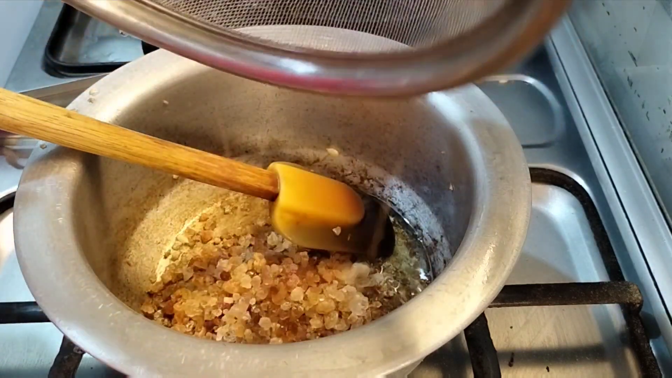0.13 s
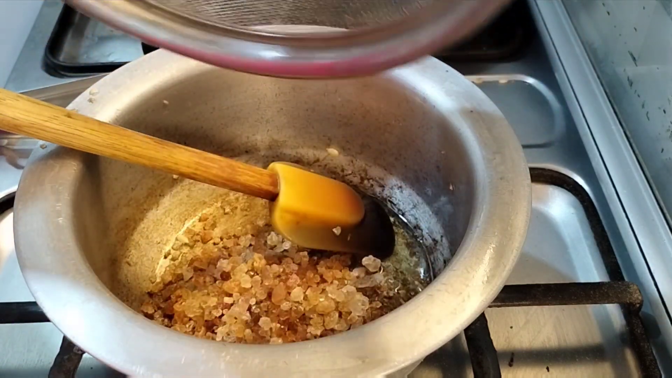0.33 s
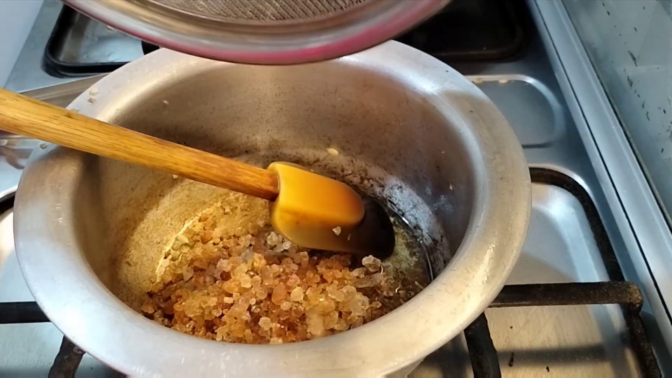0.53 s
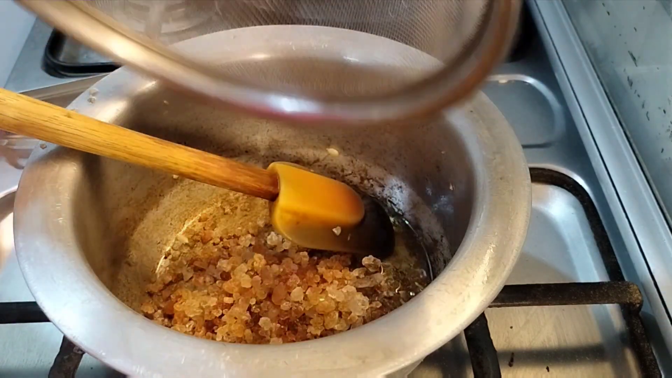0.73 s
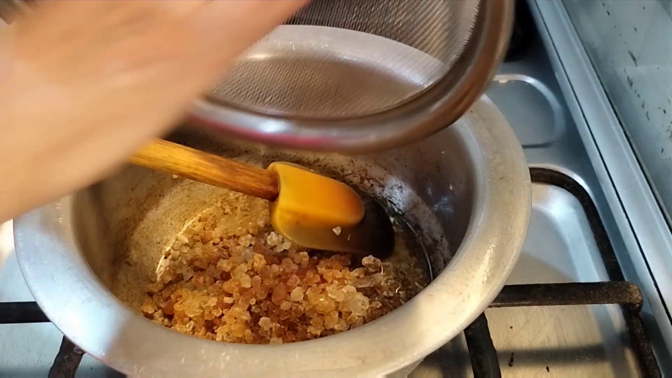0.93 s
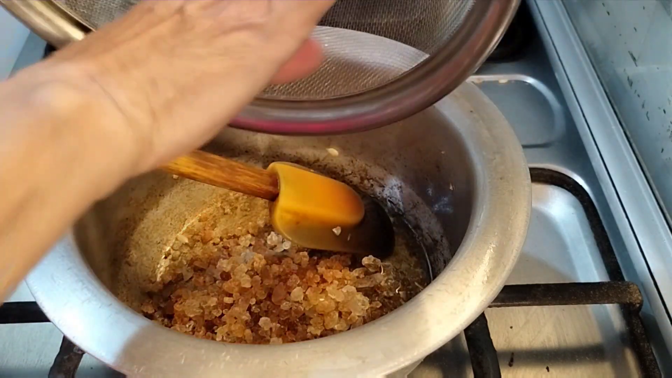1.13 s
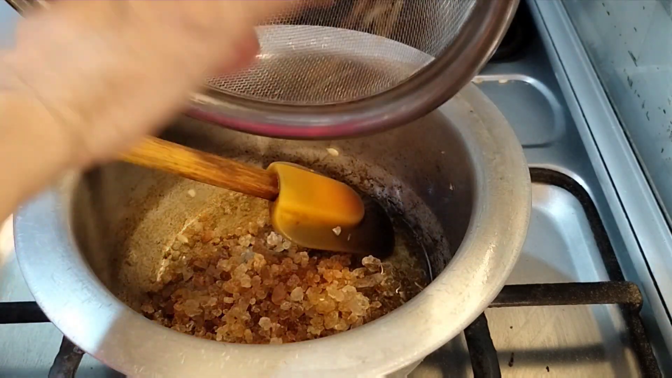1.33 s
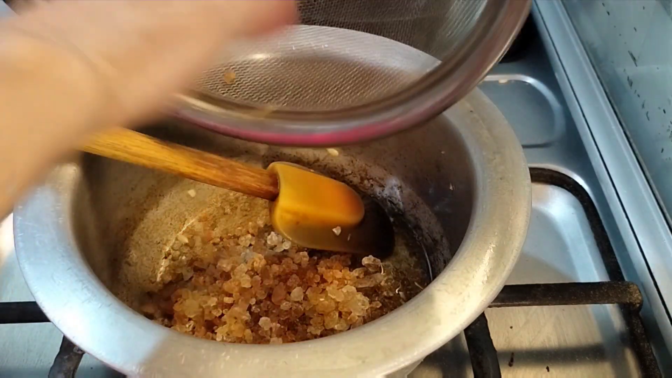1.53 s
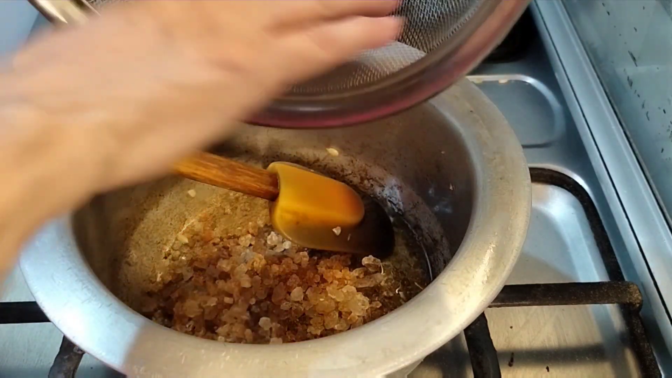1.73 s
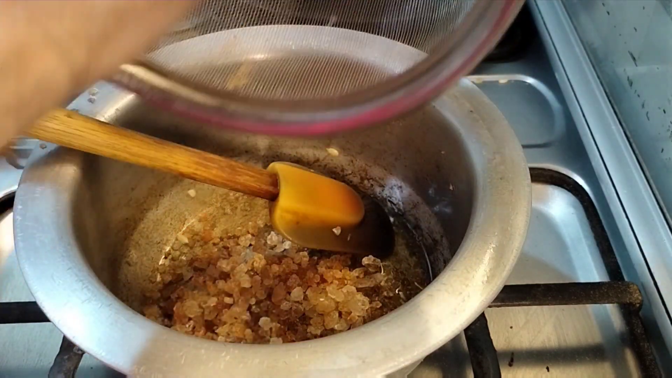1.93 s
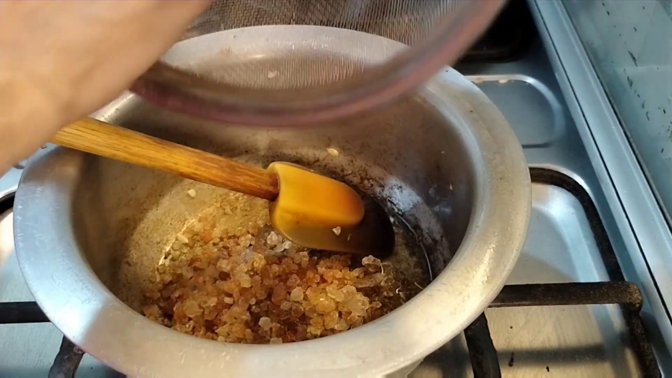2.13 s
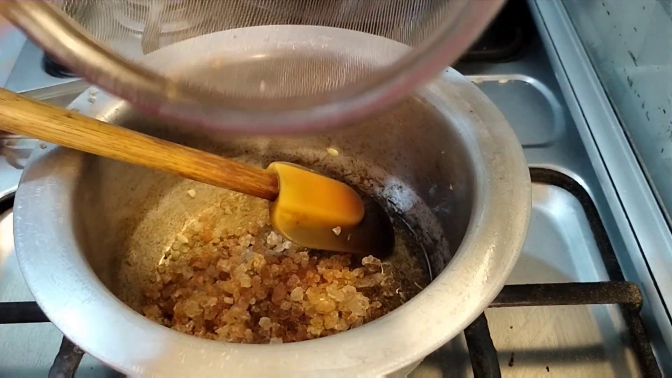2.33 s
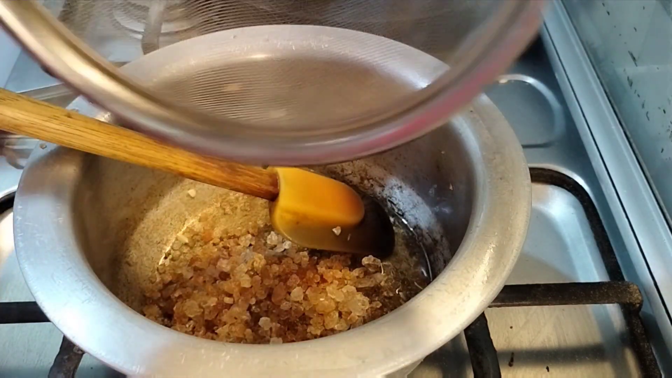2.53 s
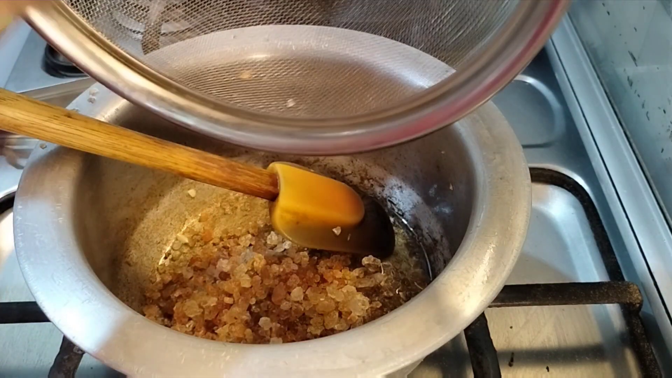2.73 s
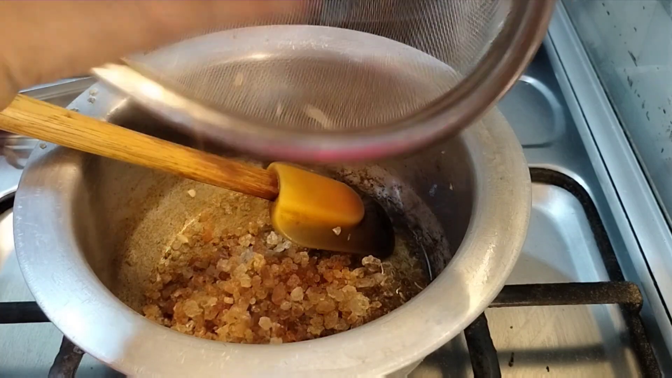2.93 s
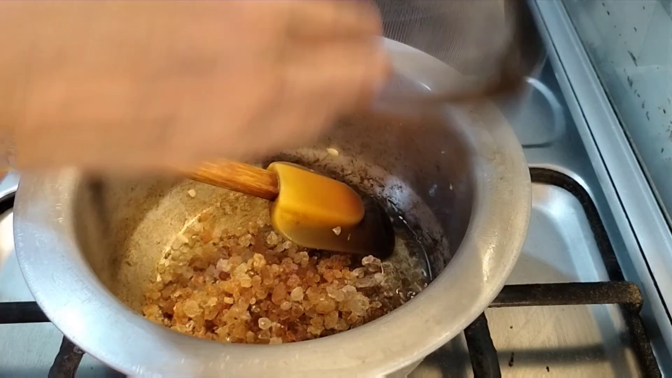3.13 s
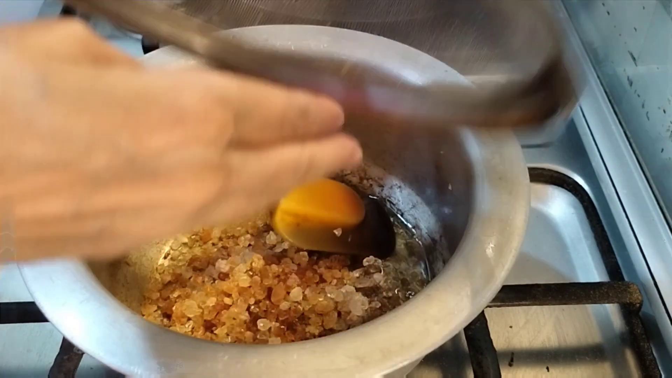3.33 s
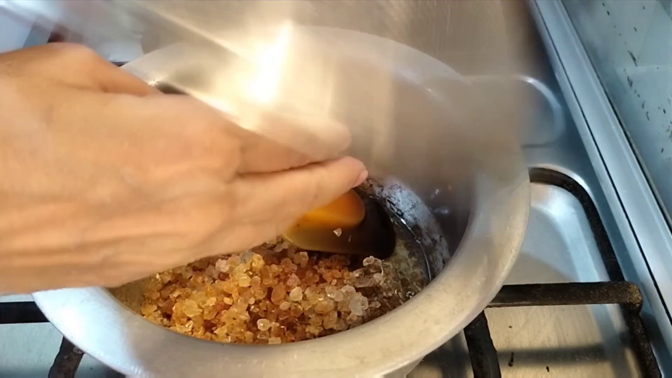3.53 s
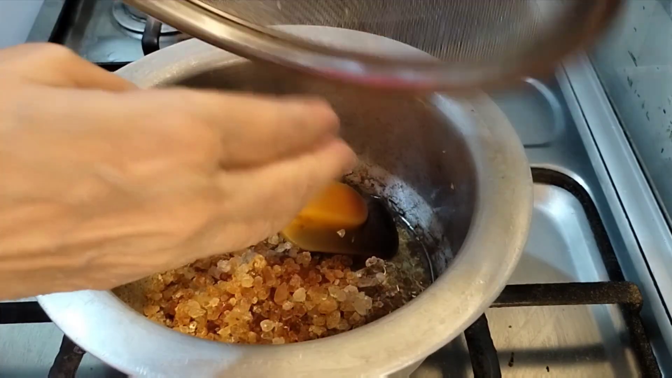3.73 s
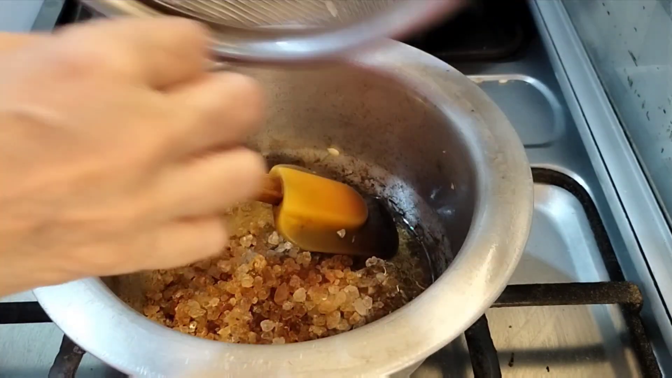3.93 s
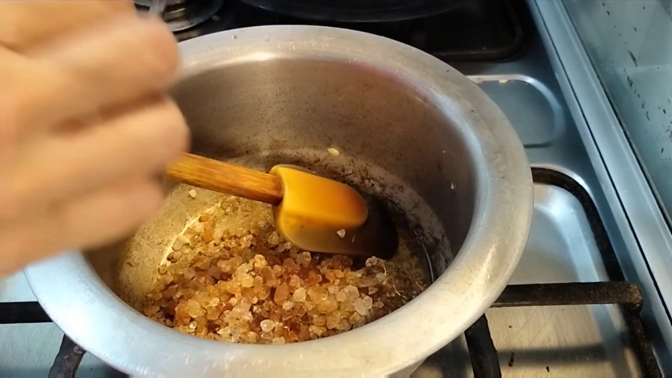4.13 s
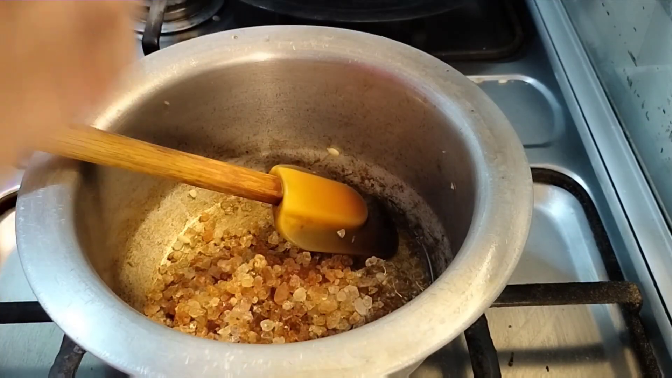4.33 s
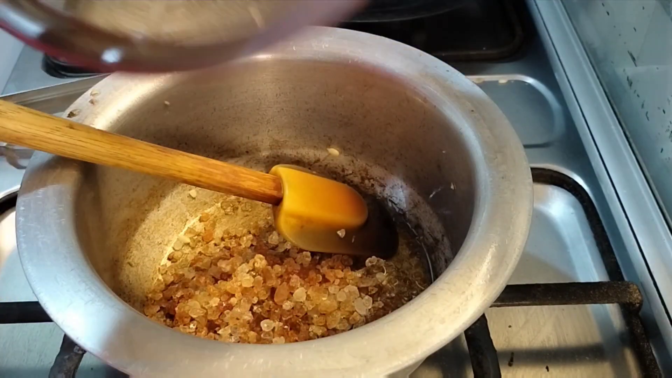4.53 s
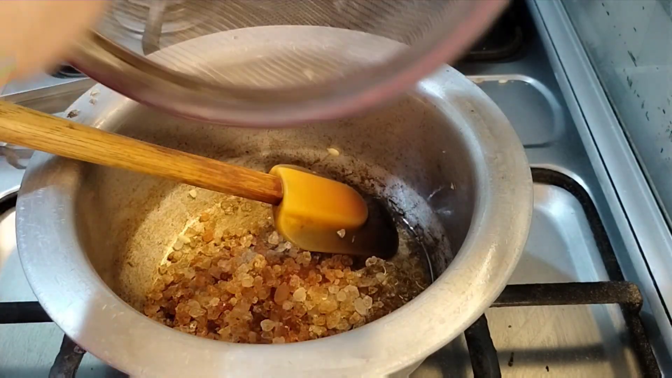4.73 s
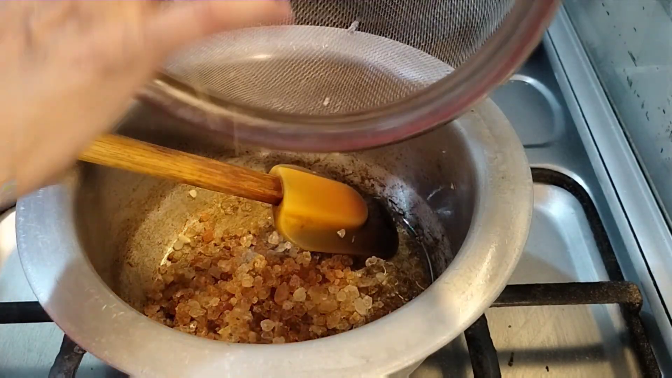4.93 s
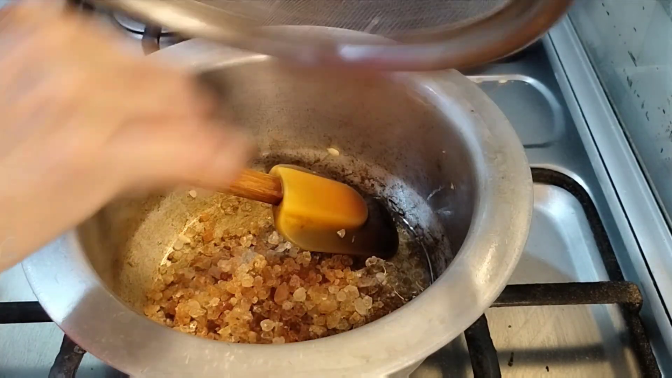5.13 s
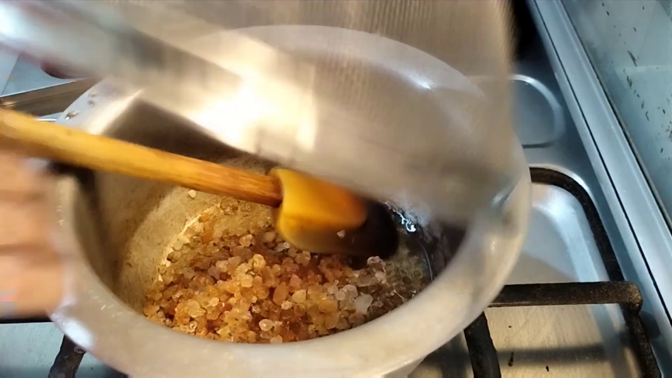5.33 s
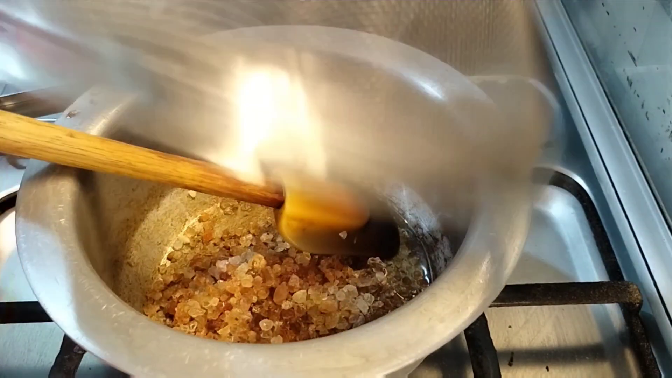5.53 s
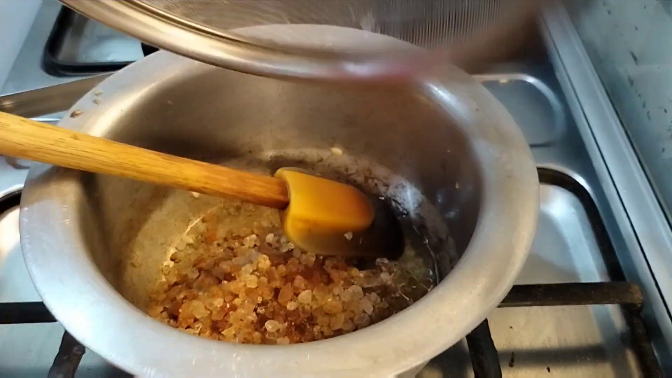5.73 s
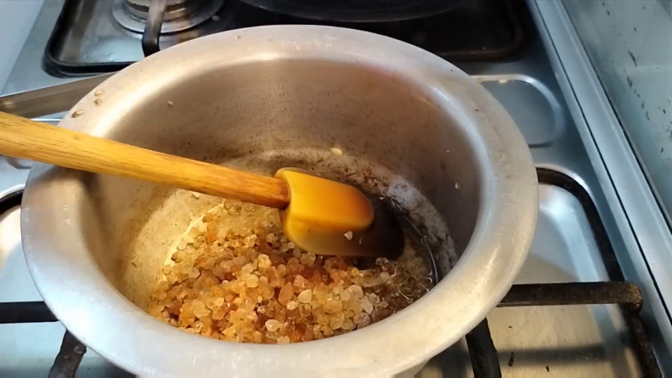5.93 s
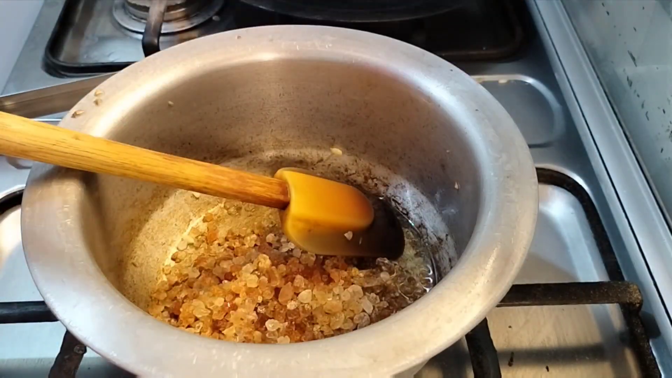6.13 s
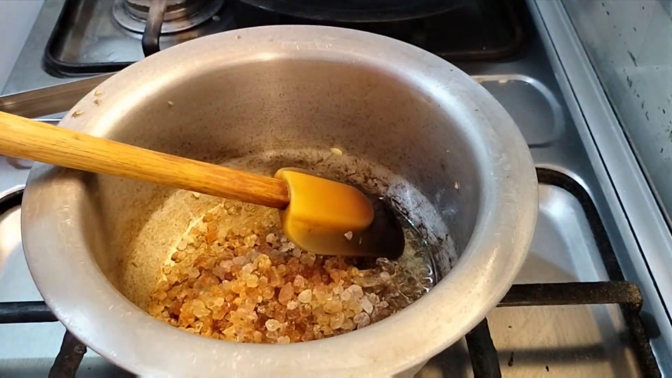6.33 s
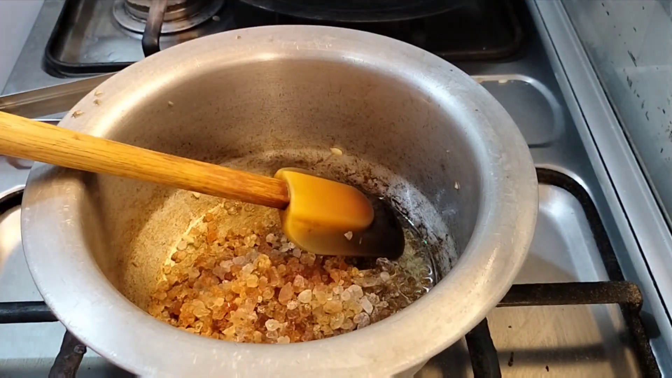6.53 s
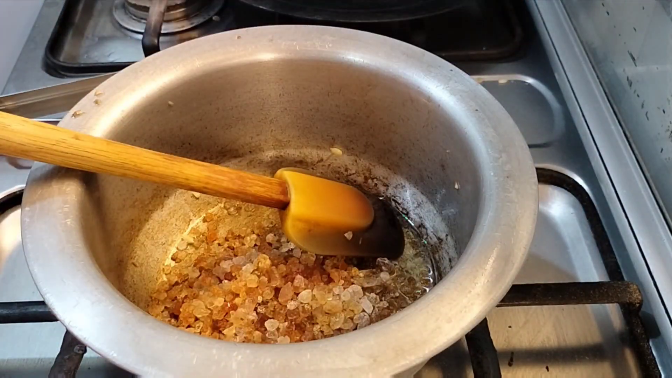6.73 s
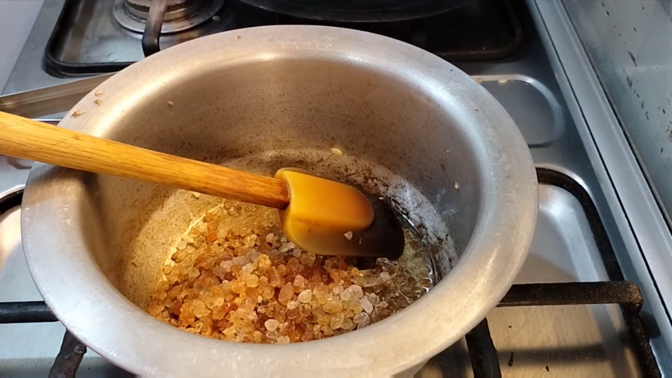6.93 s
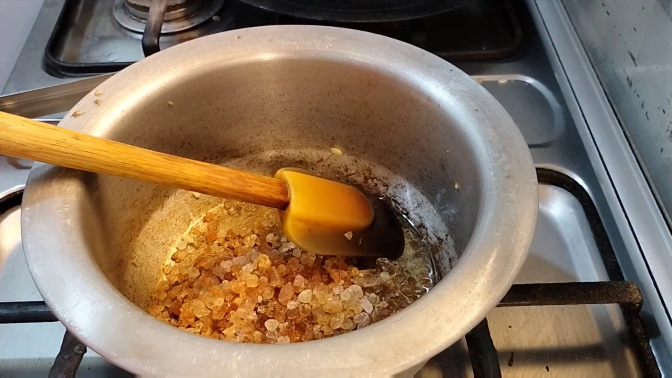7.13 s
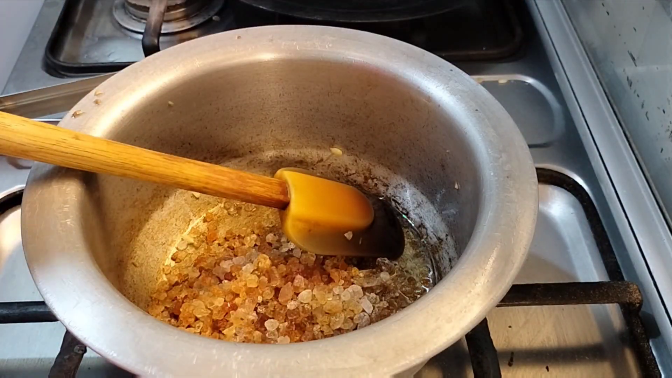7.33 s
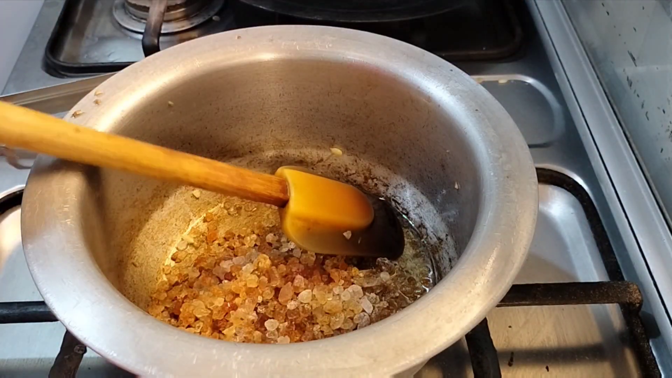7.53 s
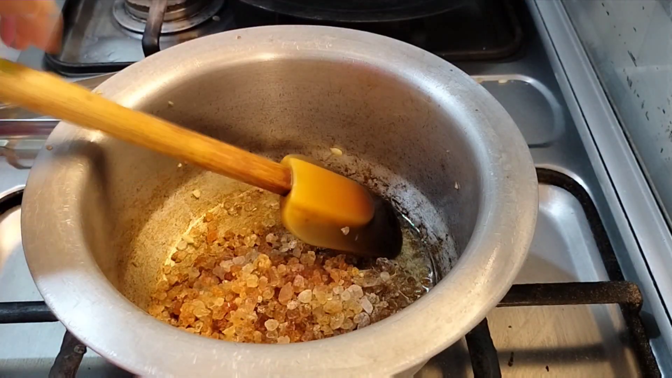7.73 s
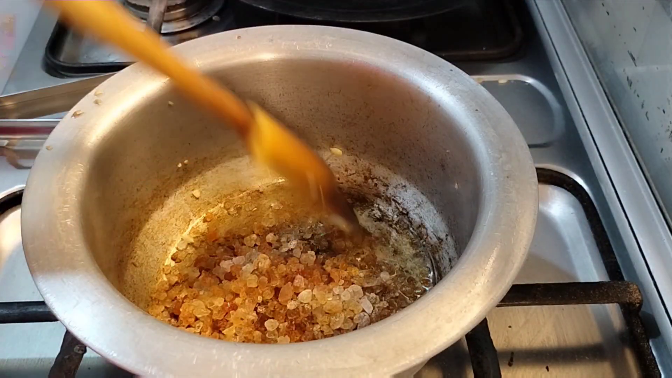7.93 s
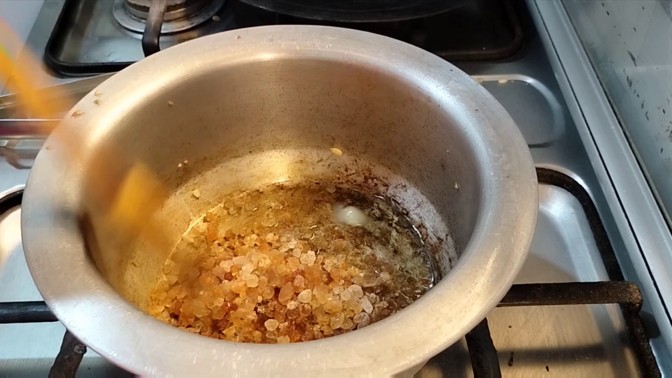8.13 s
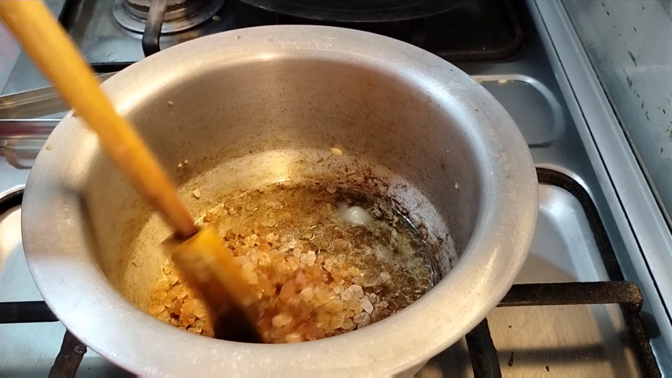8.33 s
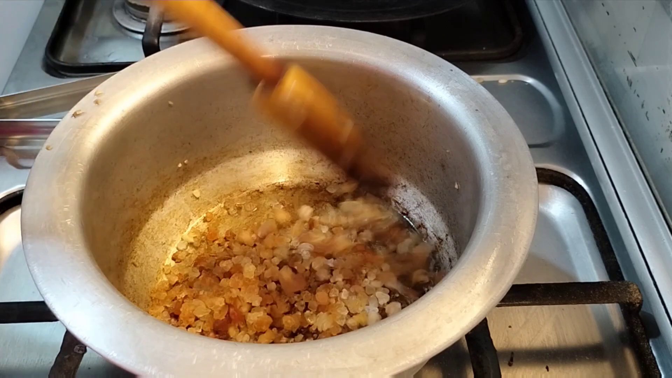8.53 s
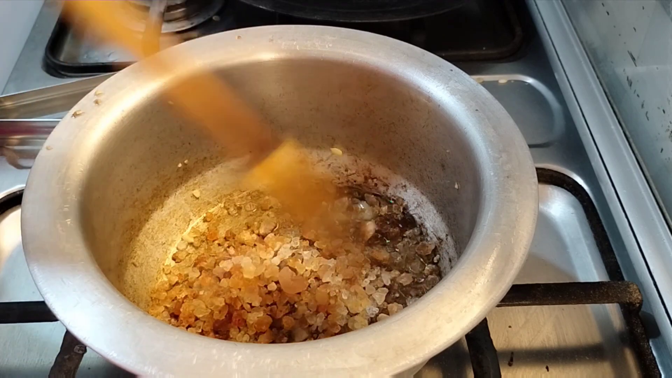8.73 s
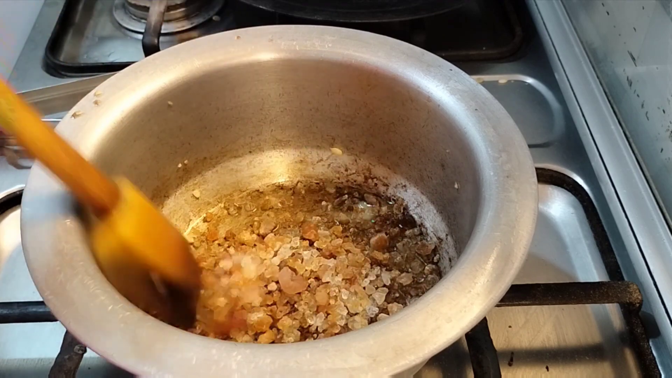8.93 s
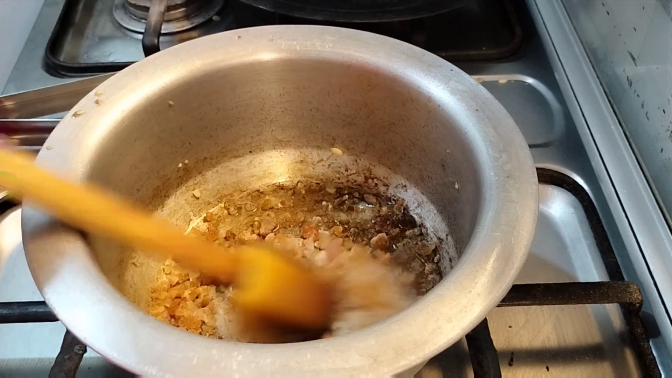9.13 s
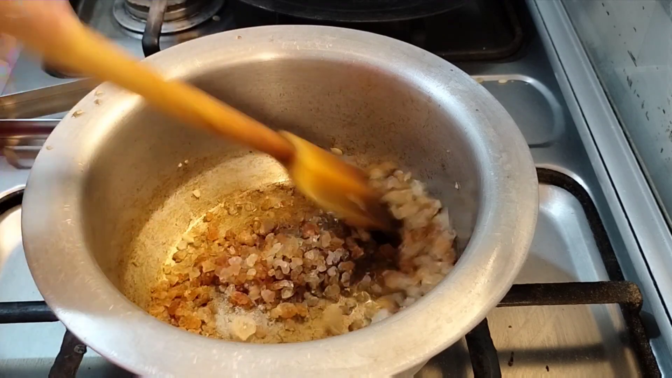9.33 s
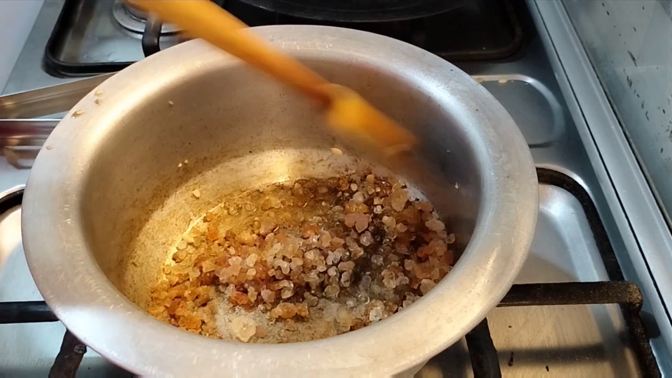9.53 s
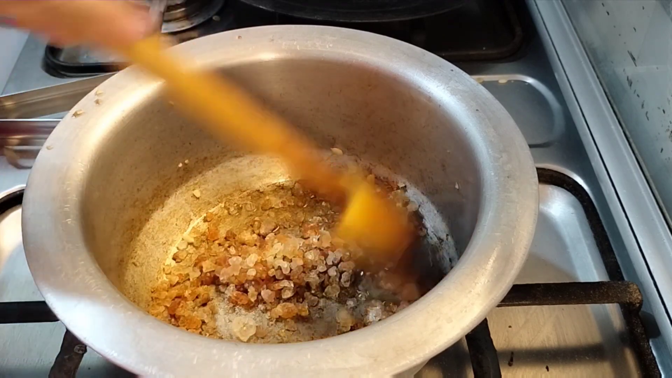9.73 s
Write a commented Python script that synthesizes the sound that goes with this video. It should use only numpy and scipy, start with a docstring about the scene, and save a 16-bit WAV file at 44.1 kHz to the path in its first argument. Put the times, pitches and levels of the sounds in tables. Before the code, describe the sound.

Heard close above a metal pot in a small reflective kitchen, with a soft gas burner rush and a very faint wavering appliance hum throughout. A spit of fat and a light sieve clink come at the start; from 0.6 s a strong sizzle swells, with sharp pops around 1.2 s and more until 3.5 s. Bright grainy mesh rustles come at 0.9-1.5 and 2.4-2.7 s. At 2.9 and 3.3 s the steel sieve bangs hard on the pot: crack, rattle, metallic ring, deep stove boom. The sizzle dwindles; soft rustles at 4.5 s, then another pair of blows at 5.0 and 5.3 s rings away. Quiet follows, with tiny spits near 7 s. Wooden handle clacks run 7.4-7.65 s. From 7.95 s to about 9.8 s the spatula rubs, scrapes hollowly and crunches crystals in uneven strokes, with thuds, snaps and high ringing, strongest around 8.9 and 9.6 s.

```python
"""A small kitchen, heard from just above a metal pot on a gas hob: noise makes the burner's rush, a sine an appliance's hum.
Crystals sizzle and spit in hot fat, made of tiny noise grains and sharp bursts; a sieve clinks on the rim and rustles.
Then the steel sieve is banged on the pot, twice two blows: decaying modes ring the pot and boom the hob, under a limiter.
Last, a spatula's wooden handle clacks on the rim and its blade scrapes round: grains through resonances, rings and snaps."""
import sys
import numpy as np
from scipy import signal
from scipy.fft import rfft, irfft, next_fast_len
from scipy.io import wavfile
from scipy.ndimage import uniform_filter1d, minimum_filter1d, map_coordinates

SR = 44100
rng = np.random.default_rng(int(sys.argv[2]) if len(sys.argv) > 2 else 0)


def waveform_to_disk(signal):
    """Save audio, clipped to [-1, 1], as 16-bit WAV at the path in sys.argv[1]."""
    frames = np.transpose(np.atleast_2d(signal))
    scaled = np.clip(frames, -1, 1) * 32767
    samples = np.round(scaled).astype(np.int16)
    wavfile.write(sys.argv[1], SR, samples)


N = 430857  # length in samples

# Modes of the pot wall. Each row: pitch in Hz, strength in dB, free decay t60 in s.
POT_MODES = [(482, -13, .7), (829, -3.5, .9), (1234, -11, .5), (1292, -5.5, .45), (1777, -1, .64),
             (1784, -11, .68), (2099, -7.5, .7), (2385, -15, .55), (2572, -15, .45), (2845, -6.5, .4),
             (2875, -9, .42), (3730, -16, .42), (3995, -17, .45), (4190, -12, .3), (4482, -18, .45),
             (4800, -20, .4), (4940, -19, .4)]
# Colour of frying fat and small grains. Each row: frequency in Hz, relative density in dB per Hz.
FRYING_COLOUR = [(60, -49), (300, -17.5), (900, -29.5), (2500, -10), (4300, -11.5), (6000, -13),
                 (7300, -6.5), (8400, 4.5), (9800, -6), (12300, -11), (14000, -7), (15400, -3.5)]
# Colour of a hard crack. Each row: frequency in Hz, relative density in dB per Hz.
CRACK_COLOUR = [(60, -21), (1200, 0), (3000, -5.5), (4300, 0.5), (6200, -14), (8600, -5.5), (11500, -13),
                (15500, -10)]
# The hob and the air in the pot, sounded by the blade. Each row: centre in Hz, width in Hz, relative level in dB.
RUBBING_MODES = [(119, 22, -8), (177, 38, 0), (596, 38, -4), (2026, 88, -12)]


def amp(db):
    """Decibels to gain."""
    return np.exp(np.asarray(db) * (np.log(10) / 20))


def unit(x):
    """Scale to rms 1."""
    return x / np.sqrt(np.mean(x ** 2) + 1e-20)


def along(points, hz):
    """(Hz, value) points read on a log axis."""
    f, values = np.transpose(points)
    return np.interp(np.log(hz + 1), np.log(f + 1), values)


def wobble(rate):
    """A smooth random curve over the whole scene, rate knots a second."""
    knots = rng.standard_normal(int(N * rate / SR) + 4)
    return map_coordinates(knots, [np.arange(N) * rate / SR])


def filtered(x, response):
    """x shaped by a response of frequency."""
    size = next_fast_len(len(x) + 8192)
    hz = np.fft.rfftfreq(size, 1 / SR)
    return irfft(rfft(x, size) * response(hz), size)[:len(x)]


def coloured(x, spectrum):
    """x shaped by a colour table, at rms 1."""
    return unit(filtered(x, lambda hz: amp(along(spectrum, hz))))


def bell(hz, centre_hz, width):
    """A smooth hump on a log axis, 1 at its centre."""
    return np.exp(-(np.log((hz + 1) / centre_hz) / width) ** 2)


def resonance(hz, centre_hz, width_hz):
    """Response of one damped resonance, 1 at its centre."""
    return 1j * hz * width_hz / (centre_hz ** 2 - hz ** 2 + 1j * hz * width_hz)


def resonances(x, table):
    """x through (Hz, width Hz, dB) resonances in parallel, at rms 1."""
    def response(hz):
        return sum(amp(db) * resonance(hz, centre_hz, width_hz) for centre_hz, width_hz, db in table)
    return unit(filtered(x, response))


def add(track, s, sound):
    """Mix a sound in from time s."""
    part = track[round(s * SR):][:len(sound)]
    part += sound[:len(part)]


def fade(t60):
    """One second of exponential decay, falling 60 dB in t60 seconds."""
    return np.exp(-np.log(1000) * np.arange(SR) / SR / t60)


def uneven(spectrum, ripple_db, spacing_hz):
    """Coloured noise with chance resonances about spacing_hz apart: each contact point has its own."""
    noise = coloured(rng.standard_normal(SR), spectrum)
    heights = np.clip(rng.standard_normal(1024), -2, 2)
    places = np.arange(len(heights))
    return unit(filtered(noise, lambda hz: amp(ripple_db * np.interp(hz / spacing_hz, places, heights))))


def burst(spectrum, t60):
    """A dense cluster of quickly dying vibrations."""
    return uneven(spectrum, ripple_db=4.5, spacing_hz=170) * fade(t60)


def ring(modes):
    """A sum of damped modes, at slightly new strengths for each blow."""
    t = np.arange(SR) / SR
    return sum(amp(db + rng.standard_normal()) * np.sin(2 * np.pi * hz * t) * fade(t60)
               for hz, db, t60 in modes)


def grains(rate, spread_db, life):
    """Random noise bursts, about rate a second, of uneven size, each fading to 1/e in life seconds."""
    sizes = (rng.random(N) < rate / SR) * amp(spread_db * np.clip(rng.standard_normal(N), -2, 2))
    power = signal.lfilter([1], [1, -np.exp(-2 / (life * SR))], sizes ** 2)
    return unit(np.sqrt(power) * rng.standard_normal(N))


def lingering(x):
    """Let each frequency of x die at the kitchen's pace."""
    # Decay of the room. Each row: frequency in Hz, t60 in s.
    kitchen_decay = [(500, 0.72), (1500, 0.61), (4000, 0.53), (9000, 0.38), (15000, 0.37)]
    hz, t, bands = signal.stft(x, SR, nperseg=256)
    decay = np.exp(-np.log(1000) * t / along(kitchen_decay, hz)[:, None])
    return signal.istft(bands * decay, SR, nperseg=256)[1][:SR]


def in_room(x, wet_db):
    """x and the answer of the walls, a decaying noise tail."""
    tail = lingering(rng.standard_normal(SR))
    return x + amp(wet_db) * signal.fftconvolve(x, tail / np.linalg.norm(tail))[:N]


def spit(lift_db):
    """One sharp snap with its brief echo inside the pot."""
    snap = burst(FRYING_COLOUR, t60=.017) * (1 - fade(t60=.0015))
    echo = amp(-14) * burst(FRYING_COLOUR, t60=.08)
    return filtered(snap + echo, lambda hz: amp(lift_db * bell(hz, centre_hz=4530, width=0.25)))


def background():
    """The burner's soft rush and the hum of an appliance, which swells and fades."""
    # Colour of the rush. Each row: frequency in Hz, relative density in dB per Hz.
    rush_colour = [(25, -22.5), (55, -31), (98, 2), (160, -4.5), (270, -2.5), (700, -6.5), (1700, -15),
                   (4000, -20.5), (8000, -60)]
    hum_hz, hum_db = 772, -61
    turn = 2 * np.pi * hum_hz * np.arange(N) / SR
    swell, waver = (.8 * wobble(11) for _ in range(2))
    hum = (1 + swell) * np.sin(turn) + waver * np.cos(turn)
    rush = coloured(rng.standard_normal(N), rush_colour)
    return amp(hum_db) * hum + amp(-53.5) * rush


def flare_level():
    """Gains of the sizzle and its big bubbles: each flare swells quickly, then sinks as its moisture runs out."""
    # Moisture meets the hot fat and boils off. Each row: start in seconds, level in dB,
    # rise time constant in s, time until dry in s.
    flares = [(-0.1, -46.5, 0.035, 0.27), (0.631, -32.5, 0.076, 3.5), (2.38, -40, 0.063, 0.49),
              (3.66, -45.5, 0.023, 1.93)]
    simmer_db = -56.5  # the fat on its own
    fresh_db, fresh_s = 8, 0.43  # fresh moisture makes big, hollow bubbles for a moment
    power = np.full((2, N), amp(simmer_db) ** 2)
    for s, db, rise_s, dry_s in flares:
        age = np.maximum(np.arange(N) / SR - s, 0)
        moisture = np.maximum(1 - age / dry_s, 0)
        level = amp(db) * (1 - np.exp(-age / rise_s)) * moisture
        big_level = level * amp(fresh_db * np.exp(-age / fresh_s))
        power += np.square([level, big_level])
    return np.sqrt(power)


def sizzle():
    """Countless bubbles burst in the fat and sound the air in the pot; hot crystals tick now and then."""
    # Air in the pot. Each row: centre in Hz, width in Hz, relative level in dB.
    cavity_modes = [(1297, 103, 2.5), (2060, 88, -0.5), (3373, 54, 3)]
    surge_db, surge_rate = 0.8, 15  # quick surges: depth, random knots a second
    level, big_level = flare_level()
    fizz = coloured(grains(rate=2700, spread_db=3.0, life=0.001), FRYING_COLOUR)
    crackle = coloured(grains(rate=70, spread_db=3.2, life=.0018), FRYING_COLOUR)
    bubble_grains = grains(rate=260, spread_db=3.5, life=.003)
    bubbles = unit(filtered(bubble_grains, lambda hz: bell(hz, centre_hz=4300, width=.36)))
    ticks = coloured(grains(rate=15, spread_db=2.5, life=.003), CRACK_COLOUR)
    hollow = resonances(grains(rate=500, spread_db=4, life=.002), cavity_modes)
    frying = fizz + amp(-3.0) * crackle + amp(-11.0) * bubbles
    surging = level * amp(surge_db * wobble(surge_rate)) * frying
    return in_room(surging + amp(-14.5) * big_level * hollow + amp(-60.0) * ticks, wet_db=-7.0)


def pops():
    """Sharp spits of fat, each with its own colour."""
    # The loudest spits. Each row: start in seconds, level in dB, lift around 4.5 kHz in dB.
    spits = [(0.0594, -14.5, 6), (1.148, -13, 9), (1.2192, -12, 1), (1.2676, -12, -2), (1.758, -18.5, 0),
             (2.121, -15, -7), (3.129, -17.5, -6), (3.506, -17.5, 2), (4.95, -26.5, 16),
             (6.9822, -22.5, -4), (7.0663, -25.5, -17)]
    out = np.zeros(N)
    for s, db, lift_db in spits:
        add(out, s, amp(db) * spit(lift_db))
    return in_room(out, wet_db=-6.5)


def rustles():
    """Short bright rustles of grains in the mesh as the sieve is patted and turned in the hand."""
    # Grains shifting in the sieve's mesh. Each row: start in seconds, relative level in dB.
    shifts = [(0.116, -32), (0.124, -28.5), (0.914, -23), (1.068, -20.5), (1.100, -22.5), (1.301, -23),
              (1.473, -23.5), (1.491, -22.5), (2.443, -25), (2.545, -23.5), (2.647, -22.5), (4.487, -27.5),
              (4.578, -28), (4.656, -32.5)]
    out = np.zeros(N)
    for s, db in shifts:
        mesh = filtered(burst(FRYING_COLOUR, t60=0.09),
                        lambda hz: amp(11.1 * bell(hz, centre_hz=4530, width=0.31)))
        add(out, s, amp(db) * mesh * (1 - fade(t60=0.008)))
    # the grains shift in clumps
    rough = np.abs(grains(rate=700, spread_db=2.5, life=.002))
    clumps = unit(uniform_filter1d(rough, size=64))
    return in_room(out * clumps, wet_db=-9.0)


def touches():
    """The sieve's frame clinks lightly on the rim: ringing modes and a short noise tick."""
    # Modes of the clink. Each row: pitch in Hz, strength in dB, t60 in s.
    clink_modes = [(2099, -6, .55), (2390, -12, .5), (3714, 6.5, .18), (4011, -5, .41), (4802, -8, .35),
                   (7687, 1, .22), (8694, 5, .15), (9039, 12, .11), (11180, 2, .15), (14840, 8, .11)]
    # Light contacts. Each row: start in seconds, relative strength in dB.
    contacts = [(0.285, -35), (3.611, -43)]
    out = np.zeros(N)
    for s, db in contacts:
        clink = amp(db - 6) * ring(clink_modes)
        tick = amp(db + 18) * burst(FRYING_COLOUR, t60=.025)
        add(out, s, clink + tick)
    return in_room(out, wet_db=-10.5)


def stroke_levels():
    """Gains of rub, scrape, rasp and crunch: the blade lands, presses, piles crystals up and tips them over."""
    # Spatula strokes. Each row: blade lands in seconds, presses hardest in seconds, rubbing in dB,
    # heap tips in seconds, scraping in dB, hollow rasp in dB, crunch in dB.
    strokes = [(7.942, 8.034, -33, 8.19, -43, -41.5, -44.5), (8.222, 8.285, -57, 8.29, -35, -38, -31),
               (8.654, 8.862, -31, 9.05, -32.5, -37, -24.5), (9.262, 9.322, -50, 9.38, -44, -54, -41.5),
               (9.425, 9.568, -42, 9.565, -31.5, -35.5, -28.5),
               (9.558, 9.642, -41, 9.655, -33.5, -34.5, -38), (9.69, 9.75, -55, 9.745, -40, -51, -30.5)]
    landing_s = 0.031  # the blade takes this long to make full contact
    rub_rise, rub_fall = 75, 99  # dB per second
    scrape_build_db, crunch_build_db = 11, 13.5  # gained as crystals pile up before the blade
    settle_rate = 112  # dB per second, as the crystals come to rest after the heap tips
    tumble_db, surge_db, tumble_s = 8.5, 2.5, 0.036  # short extra crunch and scrape as it tips
    t, power = np.arange(N) / SR, np.zeros((4, N))
    for land_s, press_s, rub_db, tip_s, scrape_db, rasp_db, crunch_db in strokes:
        contact = np.clip((t - land_s) / landing_s, 0, 1)
        press_db = np.minimum(rub_rise * (t - press_s), rub_fall * (press_s - t))
        to_go = np.clip((tip_s - t) / (tip_s - land_s), 0, 1)
        settle_db = settle_rate * np.maximum(t - tip_s, 0)
        tumble = np.exp(-((t - tip_s) / tumble_s) ** 2)
        drag_db = surge_db * tumble - scrape_build_db * to_go - settle_db
        heap_db = tumble_db * tumble - crunch_build_db * to_go - settle_db
        levels_db = [rub_db + press_db, scrape_db + drag_db, rasp_db + drag_db, crunch_db + heap_db]
        power += (contact * amp(levels_db)) ** 2
    return np.sqrt(power)


def drifting(x):
    """x with its pitch and strength wandering as the blade changes the shape of the hollow."""
    drift, patchy_db, rate = 0.04, 2, 14  # pitch bend as a share, level change, random knots a second
    place = np.arange(N) + np.cumsum(drift * wobble(rate))
    return map_coordinates(x, [place], mode="mirror") * amp(patchy_db * wobble(rate))


def stirring():
    """The blade rubs over the base, drags crystals along the singing wall and crunches through the heap."""
    # Colour of the scrape. Each row: frequency in Hz, relative density in dB per Hz.
    scrape_colour = [(300, -16.5), (900, 1), (1370, -3), (1700, 0.5), (2400, 2.5), (3100, 0), (4200, 4),
                     (6000, -19), (12000, -42)]
    rub_gain, scrape_gain, rasp_gain, crunch_gain = stroke_levels()
    rub = rub_gain * resonances(grains(rate=110, spread_db=3, life=0.006), RUBBING_MODES)
    slips = grains(rate=300, spread_db=6.5, life=0.007)
    scrape = scrape_gain * coloured(slips, scrape_colour)
    # the slips also sound one hollow note of the pot
    hollow = unit(filtered(slips, lambda hz: resonance(hz, centre_hz=1345, width_hz=170) ** 2))
    rasp = rasp_gain * drifting(hollow)
    crystals = coloured(grains(rate=300, spread_db=5, life=0.0035), FRYING_COLOUR)
    crunch = crunch_gain * filtered(crystals, lambda hz: bell(hz, centre_hz=8700, width=0.86))
    # hard crystals favour the high modes, which sing on after each stroke
    modes = np.diff(ring(POT_MODES), n=2, prepend=[0, 0])
    wall = amp(-7) * signal.fftconvolve(scrape_gain * slips, modes / np.linalg.norm(modes))[:N]
    return wall + in_room(rub + scrape + rasp + crunch, wet_db=-7.0)


def woken(centre_hz, width):
    """The part of the pot's ring that a contact wakes, around centre_hz."""
    return filtered(ring(POT_MODES), lambda hz: bell(hz, centre_hz, width))


def clacks():
    """The handle clacks on the rim; the blade thuds on the base and pinched crystals snap, ringing the pot."""
    # Wooden handle on the rim. Each row: start in seconds, level in dB, lift around 5 kHz in dB.
    handle_hits = [(7.400, -20, -1.5), (7.484, -24, -1), (7.588, -20.5, 5), (7.641, -28, 6)]
    # Wood against the rim. Each row: pitch in Hz, strength in dB, t60 in s.
    handle_modes = [(1230, -8, 0.07), (1767, -10, 0.085), (2405, -9.5, 0.076), (2920, -25, 0.09)]
    # Colour of the clack. Each row: frequency in Hz, relative density in dB per Hz.
    clack_colour = [(150, -7), (600, -8.5), (1250, -1), (2200, -6), (3200, -9), (4400, -10), (6200, -22.5),
                    (8600, -10), (12000, -24.5), (15500, -15)]
    # Soft blade bumping the pot. Each row: start in seconds, thud in dB, drive of the pot's ring in dB.
    bumps = [(7.981, -26.5, -42), (8.766, -20, -35), (8.804, -24.5, -47), (8.851, -20, -19),
             (8.877, -20, -27.5), (9.025, -33, -31)]
    # Crystals cracking between blade and wall. Each row: start in seconds, drive of the snap in dB,
    # drive of the pot's ring in dB.
    snaps = [(8.255, -15, -44), (8.286, -18.5, -44), (8.307, -5.5, -44), (8.314, -12, -44),
             (8.8846, -4, -23.5), (9.0539, -5, -16), (9.378, -21, -38), (9.5524, -3.5, -17),
             (9.645, -5.5, -18.5), (9.7425, -8.5, -42)]
    waver_db, waver_rate = 2, 28  # the sliding blade damps the wall unevenly: depth, random knots a second
    dry, wall = np.zeros(N), np.zeros(N)
    for s, db, lift_db in handle_hits:
        contact = coloured(rng.standard_normal(SR), clack_colour) * fade(t60=0.074)
        wood = filtered(contact + ring(handle_modes),
                        lambda hz: amp(lift_db * bell(hz, centre_hz=5030, width=0.79)))
        add(dry, s, amp(db) * wood)
    for s, db, ring_db in bumps:
        thud = resonances(rng.standard_normal(SR), RUBBING_MODES) * fade(t60=0.17)
        clack = amp(-5) * burst(clack_colour, t60=0.068)
        add(dry, s, amp(db) * (thud + clack))
        add(wall, s, amp(ring_db) * woken(centre_hz=1740, width=0.14))
    for s, db, ring_db in snaps:
        snap = filtered(spit(lift_db=-12), lambda hz: bell(hz, centre_hz=8000, width=1.0))
        add(dry, s, amp(db) * snap)
        add(wall, s, amp(ring_db) * woken(centre_hz=4480, width=0.23))
    return wall * amp(waver_db * wobble(waver_rate)) + in_room(dry, wet_db=-4)


def spatula():
    """The spatula stirs and knocks on the pot; the harder the contact, the higher the modes it wakes."""
    return stirring() + clacks()


def rattles():
    """The sieve's frame chatters on the rim after a blow: a hard tick and a choked ring of the pot."""
    # Frame against the rim. Each row: start in seconds, strength in dB.
    chatters = [(2.970, -7), (3.007, -8.5), (5.188, -26), (5.262, -29)]
    out = np.zeros(N)
    for s, db in chatters:
        tick = burst(CRACK_COLOUR, t60=0.027)
        choked = ring(POT_MODES) * fade(t60=0.096)
        add(out, s, amp(db) * (tick + choked))
    return out


def knocks():
    """Each blow cracks, rings the pot, shakes the grate and booms the hob top; then the pot rocks back."""
    # Sieve blows on the pot. Each row: start in seconds, strength in dB, drive of the pot's ring in dB,
    # drive of the hob's boom in dB, the same boom as the pot rocks back in dB.
    blows = [(2.915, 6.5, -11.5, 4, -30), (3.282, -9.5, -53, -19, -39), (3.286, 0, -14, -3.5, -27),
             (4.978, 1, -21, -2.5, -40), (5.003, 1, -8.5, -9.5, 0), (5.294, -1, -23.5, -27, -6)]
    # Sheet-steel hob top. Each row: pitch in Hz, strength in dB, t60 in s.
    hob_modes = [(89.4, -21, 0.73), (132, -13, 0.52), (145.3, -25, 0.66), (186.1, 3, 0.24), (207, -13, 0.7)]
    # Colour of the shaken grate. Each row: frequency in Hz, relative density in dB per Hz.
    clatter_colour = [(60, -16), (120, 10.5), (260, 2), (900, 0.5), (1300, 1), (1700, -5), (4200, -12),
                      (6200, -24), (8600, -14), (11500, -27.5), (15500, -27)]
    rock_s = 0.035  # the pot lands back on the grate this long after a blow
    blow_clatter_db, rock_clatter_db, rock_crack_db = -12, -16, -19  # against the blow's strength
    out = np.zeros(N)
    # the sieve stays pressed on the rim and damps it
    held = fade(t60=2.2)
    for s, db, ring_db, boom_db, rock_boom_db in blows:
        add(out, s, amp(ring_db) * ring(POT_MODES) * held)
        blow = (s, db, db + blow_clatter_db, boom_db)
        rock = (s + rock_s, db + rock_crack_db, db + rock_clatter_db, rock_boom_db)
        for at, crack_db, clatter_db, hob_db in (blow, rock):
            grate = uneven(clatter_colour, ripple_db=3.5, spacing_hz=45)
            boom = ring(hob_modes) * (1 - fade(t60=0.04))
            add(out, at, amp(crack_db) * burst(CRACK_COLOUR, t60=0.057))
            add(out, at, amp(clatter_db) * lingering(grate))
            add(out, at, amp(hob_db) * boom)
    return out


def scene():
    """Everything at one microphone above the pot."""
    kitchen = background() + sizzle() + pops()
    sieve = rustles() + touches() + rattles() + knocks()
    return (kitchen + sieve + spatula())[None]


def limiter(x, ceiling_db, release_db):
    """The gain ducks under loud sound and recovers at release_db a second; brief spikes slip through."""
    level_db = 10 * np.log10(np.abs(uniform_filter1d(x ** 2, size=130)) + 1e-12)
    over_db = np.maximum(level_db - ceiling_db, 0)
    # a running maximum against a rising ramp gives the steady recovery
    ramp = release_db * np.arange(N) / SR
    gain_db = ramp - np.maximum.accumulate(over_db + ramp)
    early_db = minimum_filter1d(gain_db, size=65)
    return x * amp(uniform_filter1d(early_db, size=65))


def record(dry):
    """The recorder limits the blows, clips what is left and cuts the deep bass and the top."""
    top_hz = 15700
    held = np.clip(limiter(dry[0], ceiling_db=-6.0, release_db=127.0), -1, 1)
    bass_cut = signal.butter(2, 55, "highpass", fs=SR, output="sos")
    held = signal.sosfilt(bass_cut, held)
    return filtered(held, lambda hz: hz < top_hz)[None]


dry = scene()
out = record(dry)
waveform_to_disk(out)
```